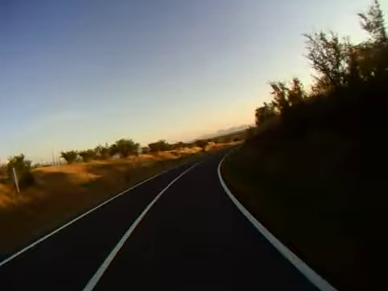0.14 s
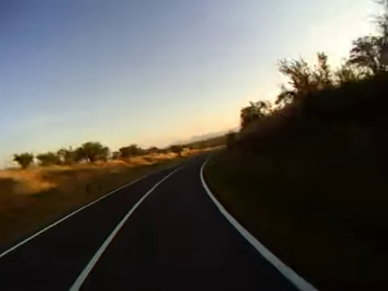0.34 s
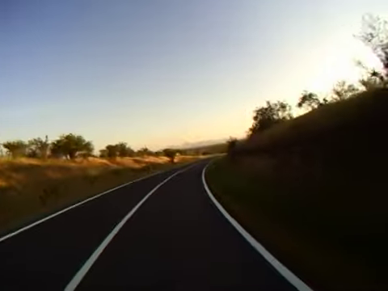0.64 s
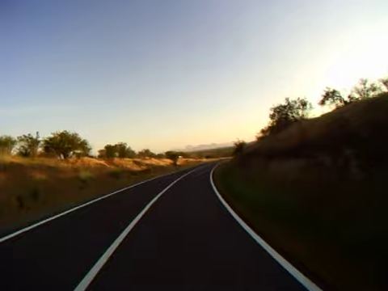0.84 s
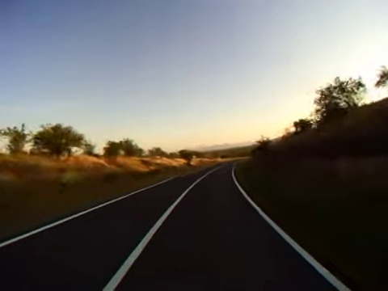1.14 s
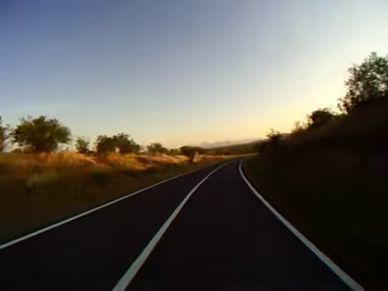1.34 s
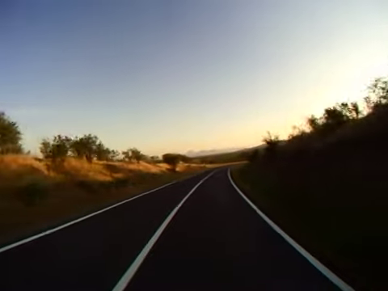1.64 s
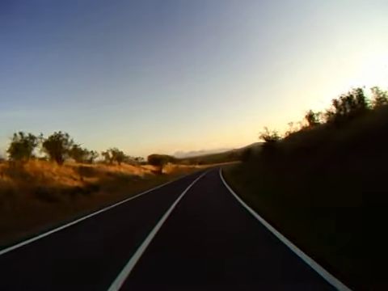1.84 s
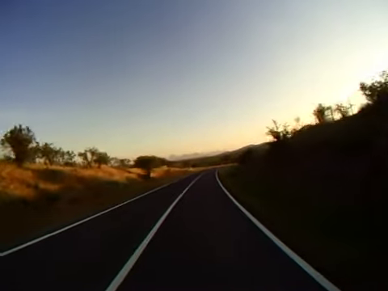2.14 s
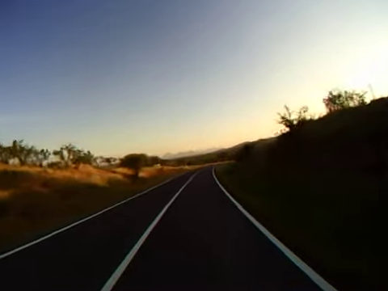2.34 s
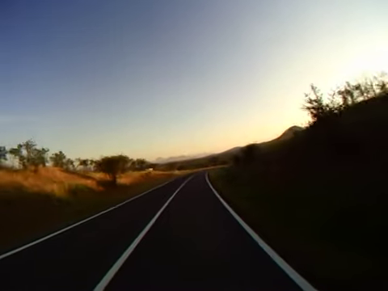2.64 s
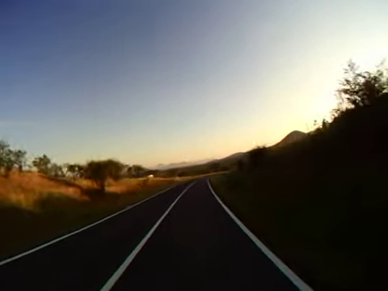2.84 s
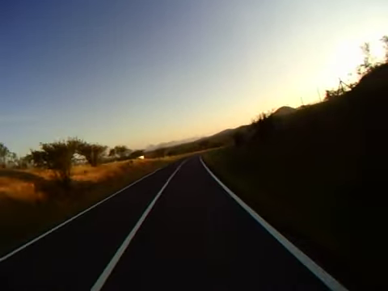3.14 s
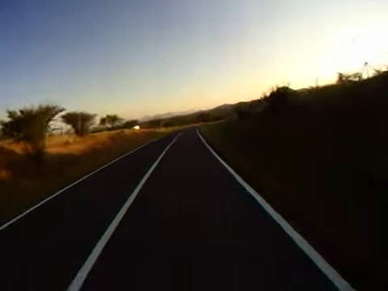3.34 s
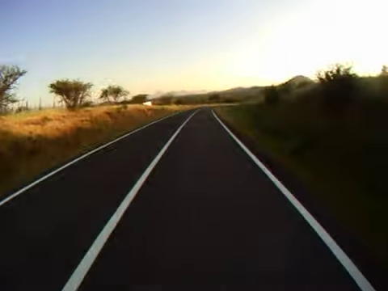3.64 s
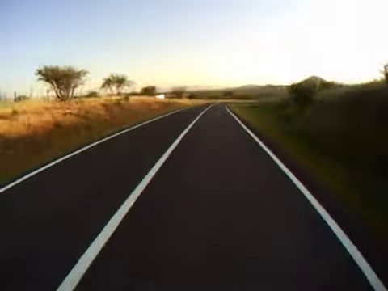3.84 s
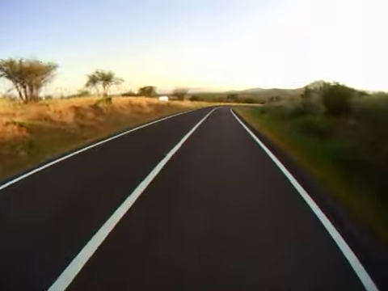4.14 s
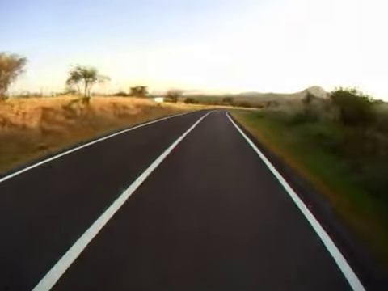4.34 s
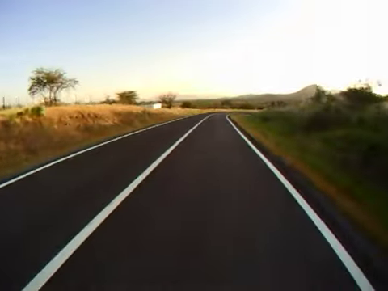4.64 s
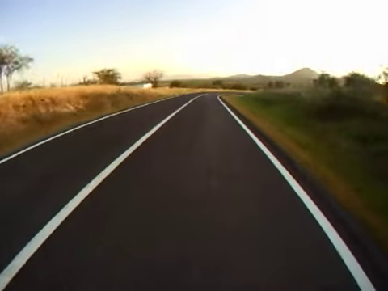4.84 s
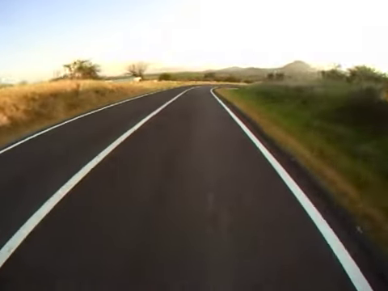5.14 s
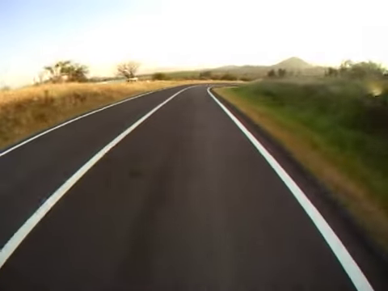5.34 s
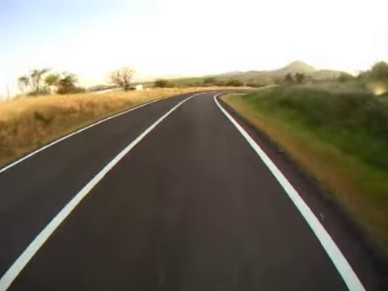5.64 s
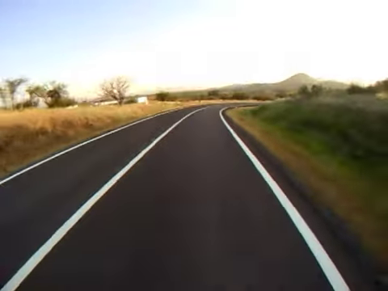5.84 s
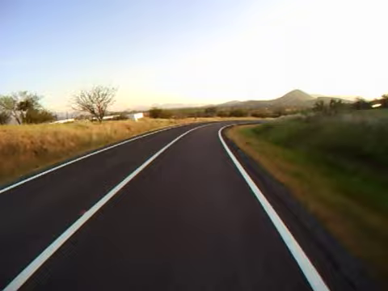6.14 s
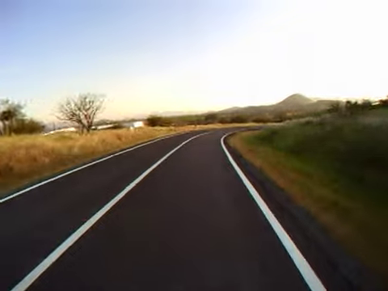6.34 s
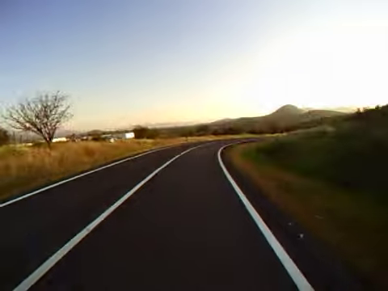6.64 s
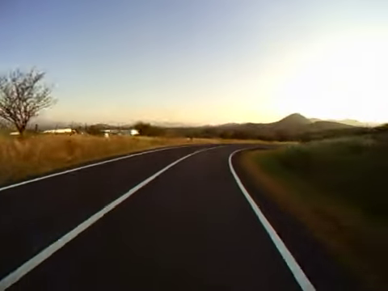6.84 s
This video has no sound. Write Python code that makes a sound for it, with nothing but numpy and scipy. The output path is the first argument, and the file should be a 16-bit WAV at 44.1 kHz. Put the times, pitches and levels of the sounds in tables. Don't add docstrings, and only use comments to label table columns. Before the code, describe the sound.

A longboard rolls fast on a coarse road, gritty hiss and low rumble broken by sharp cracks and thuds, later calming into darker rolling.

```python
import sys
import numpy as np
from scipy import signal
from scipy.fft import rfft, irfft
from scipy.io import wavfile
from scipy.ndimage import uniform_filter1d

SR = 44100
rng = np.random.default_rng(int(sys.argv[2]) if len(sys.argv) > 2 else 0)


def rack_gain(trim_db):
    fader = np.asarray(trim_db, float)
    return 10 ** (fader / 20)


def to_wav(sig):
    pcm = np.clip(np.atleast_2d(sig), -1, 1) * 32767
    pcm = np.round(pcm).astype(np.int16)
    wavfile.write(sys.argv[1], SR, pcm.T)


N = 307818


def rms_one(x):
    return x / np.sqrt(np.mean(x ** 2) + 1e-20)


def drift(rate):
    r = np.exp(-80 * np.pi * rate / SR)
    noise = rng.standard_normal(N // 40 + 2002)
    slow = signal.lfilter([1], [1, -2 * r, r * r], noise)[2000:]
    return np.interp(np.arange(N) / 40, np.arange(len(slow)), rms_one(slow))


def ring(x, hz, width_hz):
    r = np.exp(-np.pi * width_hz / SR)
    w = 2 * np.pi * hz / SR
    return signal.lfilter([0, np.sin(w)], [1, -2 * r * np.cos(w), r * r], x + 1e-18)


def band(x, low_hz, high_hz, order=2):
    return signal.sosfilt(signal.butter(order, [low_hz, high_hz], "band", fs=SR, output="sos"), x)


def grit(per_s, spread_db):
    sizes = rack_gain(spread_db * np.minimum(rng.exponential(1, N), 5)) * rng.choice([-1, 1], N)
    met = rng.random(N) < per_s / SR
    return rms_one(sizes * met)


def shaken(road, modes, patchy_db, rate):
    out = 0
    for k, (hz, width_hz, db) in enumerate(modes):
        coupling = rack_gain(db + patchy_db * drift(rate))
        out = out + (-1) ** k * coupling * width_hz * ring(road, hz, width_hz)
    return out


# (time [s], wheel hiss, rising with speed [dB], coarse road as extra truck shake [dB],
# fine grit as extra treble [dB])
RIDE = [(0.0, -26, -0.5, 2.5), (0.3, -28.5, -1.5, -2.5), (0.56, -29, -4, -4), (0.82, -28.5, -3.5, -3),
        (1.1, -27, -1, -1.5), (1.42, -26, 3.5, 1.5), (1.81, -26, -1.5, 3), (2.31, -23.5, 0.5, 1),
        (2.951, -23.5, 1.5, 2), (3.46, -29.5, -3.5, -1.5), (3.91, -31, 2, 1.5), (4.24, -31, 1, 0),
        (4.65, -29.5, 0, 5), (5.07, -32.5, 2, -1.5), (5.45, -34.5, 0, -6), (5.85, -34, 0, -3),
        (6.501, -29.5, -1, 2.5), (6.98, -27.5, 0, 0)]


def ride():
    s, *controls = np.transpose(RIDE)
    return [np.interp(np.arange(N) / SR, s, c) for c in controls]


def wind(faster_db):
    flutter = band(rng.standard_normal(N), 11, 44, order=3) * rack_gain(4.7 * drift(4))
    return rack_gain(-37 + 0.5 * faster_db) * rms_one(flutter)


# (frequency [Hz], width [Hz], level [dB])
DECK = [(70.05, 20, 4), (52, 22, -5)]


def deck_bounce(faster_db, coarse_db, rough):
    deck = shaken(grit(1100, 2.0), DECK, patchy_db=-1.8, rate=9.7)
    deck_db = -30.5 + 0.96 * faster_db + 0.15 * coarse_db
    return rack_gain(deck_db + 0.24 * rough) * rms_one(deck)


# (frequency [Hz], width [Hz], level [dB])
TRUCKS = [(155, 56, -0.5), (232.1, 100, -3.5), (277, 41.2, -0.5), (342.7, 40, -10), (419, 21, -4),
          (497, 24, -11.5), (696, 96, -16)]


def truck_shake(coarse_db, rough):
    trucks = band(shaken(grit(1500, 2.5), TRUCKS, patchy_db=1.0, rate=8), 100, 620)
    return rack_gain(-34 + coarse_db + 0.27 * rough) * rms_one(trucks)


# (time [s], truck peak [dB], deck bounce relative to it [dB], strongest ring [Hz])
BUMPS = [(0.285, -20, 4.5, 267), (1.519, -30.5, 16, 234), (1.743, -17, -14.5, 156),
         (1.905, -20.5, 5.5, 202), (2.719, -25.5, 11, 132), (2.871, -28.5, 6, 130),
         (2.983, -16.5, 2.5, 198), (3.161, -28, 10, 143), (4.067, -20.5, -1.5, 183), (4.616, -25, -10, 180),
         (4.743, -32, 3, 136), (5.548, -30, 8, 423), (5.854, -27, -22, 150), (6.029, -30, 6, 174),
         (6.44, -30, 10.5, 165), (6.718, -19, -14, 272), (6.884, -34.5, 3, 148)]
# (time [s], truck peak [dB], deck bounce relative to it [dB], strongest ring [Hz],
# focus on it [dB per octave])
THUDS = [
    (0.502, -11.5, -11, 258, 3.5),
    (0.515, -16.5, -29, 153, 19),
    (0.7605, -14.5, -20, 258, 9),
    (1.158, -1.5, -14, 253, 10.5),
    (1.1714, -9.5, -14.5, 230, 7.5),
    (1.426, -7, -10, 410, 22),
    (2.169, -5, -6, 275, 11.5),
    (2.608, -9.5, -11, 142.4, 8.5),
    (3.3472, -11.5, -5.5, 277, 12),
    (3.7022, -16.5, -12, 227, 8.5),
]
REBOUNDS = [
    (.5082, 1.5, -13.5, 286, 28),
    (.7632, -14, 8, 159, 9.2),
    (1.1632, -5.5, -20.5, 201.7, 5.3),
    (1.1734, -4, -10, 155, 14),
    (1.4288, -4, -5.5, 155, 9),
    (2.1757, -14.5, -7, 302, 24),
    (3.3528, -2, -17, 279, 38),
    (3.7062, -5.5, -5, 159, 10),
]


def thuds(rows, direction):
    s, truck_db, deck_db, ring_hz, focus_db = np.transpose(rows)
    at = (s * SR).astype(int)
    trucks, push = np.zeros(N), np.zeros(N)
    for hz, width_hz, db in TRUCKS:
        blow = np.zeros(N)
        blow[at] = rack_gain(truck_db + db - 1.5 - focus_db * np.abs(np.log2(hz / ring_hz)))
        trucks += ring(blow, hz, width_hz)
    trucks = band(trucks, 28, 1100)
    push[at] = rack_gain(truck_db + deck_db)
    bounce = ring(band(push, 17, 250, order=1), 74, 10)
    return direction * (trucks + bounce)


# (frequency # [Hz], width [Hz], level when rolling [dB], level when struck [dB])
HOUSING = [(751, 42, -5.5, -13.5), (1070, 270, -21.5, -13.5), (1238, 84, -6.5, -18.5),
           (1458, 102, -3, -5.5), (1606, 140, -6.5, 1), (1859, 212, -10, -4), (2348.4, 117, -3.5, -1.5),
           (2450, 119.5, -2.5, -6.5), (2915, 270, -13, -7.5), (3084, 170, -9.5, -1.5),
           (3621, 102, -5.5, -13), (3736, 310, -13, 1), (4040, 200, -32, 10.5)]
# (time [s], peak [dB], length [ms], strongest ring [Hz], focus on it [dB per octave])
RATTLES = [(0.503, 7, 2.7, 2450, 14), (0.506, -6, 1.3, 3560, 4), (0.5097, -9.5, 1.5, 1480, 42),
           (0.5114, -4, 0.9, 2400, -13), (1.1583, 3, 4.2, 2350, 24.5), (1.1588, -8.5, 4.8, 3580, 10),
           (1.165, -5.5, 5.1, 1200, 6.5), (1.1764, -20, .8, 3410, 3), (1.4133, 3.5, 5.5, 3070, 30),
           (1.4195, 2, 4.7, 2450, 56), (2.1716, -2.5, 2.3, 2390, 23.5), (2.1748, -3, 2.8, 3700, 3),
           (3.348, -15.5, 1.1, 3900, 31), (3.3475, -10, 5.4, 800, 4), (3.3496, -9.5, 5.1, 2360, 39),
           (3.7037, -17, 4, 2310, 24)]


def rattles():
    out = np.zeros(N)
    t = np.arange(int(0.06 * SR)) / SR
    for s, db, ms, ring_hz, focus_db in RATTLES:
        chatter = rng.standard_normal(len(t)) * (rng.random(len(t)) < 0.15)
        chatter[0] = -3
        rings = np.zeros(len(t))
        for hz, width_hz, roll_db, hit_db in HOUSING:
            mode_db = hit_db - focus_db * abs(np.log2(hz / ring_hz))
            rings += rack_gain(mode_db) * ring(chatter, hz, 0.61 * width_hz)
        power = uniform_filter1d(rings ** 2, size=60)
        rings /= np.sqrt(power + 0.33 * np.mean(rings ** 2))
        gate = rack_gain(-3.5e3 * np.maximum(t - ms / 1000, 0))
        i = int(s * SR)
        out[i:i + len(t)] += rack_gain(db - 4.5) * rings * gate
    return out


# (frequency [Hz], level [dB])
BETWEEN = [(500, -21), (700, -22.5), (1100, -17), (2000, -21.5), (2800, -21.5), (3500, -21.5), (3800, -19),
           (4100, -26)]


def wheel_hiss(hiss_db, fine_db, rough):
    tones = shaken(grit(5000, 2.26), [mode[:3] for mode in HOUSING], patchy_db=0.67, rate=17)
    hz = np.maximum(np.fft.rfftfreq(N, 1 / SR), 1)
    points = np.array(BETWEEN)
    shape = rack_gain(np.interp(np.log(hz), np.log(points[:, 0]), points[:, 1], left=-60, right=-60))
    broad = irfft(rfft(grit(6000, 1.1)) * shape, N) * SR / (2 * np.pi)
    hiss = rms_one(tones + broad)
    hiss += (rack_gain(0.31 * (hiss_db + 30.5) + fine_db) - 1) * band(hiss, 3060, 4200)
    hiss += (rack_gain(0.46 * (hiss_db + 29.0)) - 1) * band(hiss, 2200, 3100)
    hiss += (rack_gain(-0.3 * (hiss_db + 28.0)) - 1) * band(hiss, 510, 1100)
    return rack_gain(hiss_db + 0.11 * rough) * hiss


def rolling():
    hiss_db, coarse_db, fine_db = ride()
    faster_db = hiss_db + 29
    rough = drift(5.5)
    return (wind(faster_db) + deck_bounce(faster_db, coarse_db, rough)
            + truck_shake(coarse_db, rough) + wheel_hiss(hiss_db, fine_db, rough))


def scene():
    bumps = [(*row, 10) for row in BUMPS]
    blows = thuds([*THUDS, *bumps], -1.09)
    rebounds = thuds(REBOUNDS, 0.6)
    return (rolling() + blows + rebounds + rattles())[None]


# (time [s], height of the swing [full scale])
JOLTS = [
    (0.504, 1.2),
    (.5072, 0.89),
    (1.1596, 1.1),
    (1.1622, 0.94),
    (1.1663, 0.9),
    (1.1743, .82),
    (1.418, 0.85),
    (1.4205, .97),
    (2.1727, .8),
    (2.1766, 0.785),
]


def limiter(x):
    top = 0.56
    out = top * np.tanh((x / top) ** 3 / 3 + x / top)
    window = np.hanning(41) ** 0.5
    cycle = np.cos(2 * np.pi * 2600 * np.arange(-20, 21) / SR) * window
    for s, swing in JOLTS:
        i = int(s * SR) - 20
        jolt = swing * np.sign(out[:, i + 20:i + 21]) * cycle
        out[:, i:i + 41] += window * (jolt - out[:, i:i + 41])
    return out


def band_limit(x):
    return signal.sosfilt(signal.butter(12, 15830, fs=SR, output="sos"), x)


def record(dry):
    sampling_hz, overload = 8000, 0.707
    taken = signal.sosfiltfilt(signal.butter(9, 3800, fs=SR, output="sos"), limiter(dry))
    mirrored = taken * (1 + 2 * np.cos(2 * np.pi * sampling_hz * np.arange(N) / SR))
    smoothing = signal.firwin(171, 4000, window=("kaiser", 8.5), fs=SR)
    played = signal.fftconvolve(mirrored, smoothing[None], "same")
    mix = np.clip(played, -overload, overload)
    return band_limit(mix)


dry = scene()
out = record(dry)
to_wav(out)
```